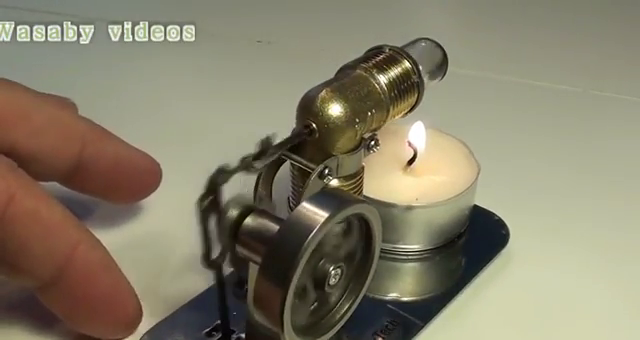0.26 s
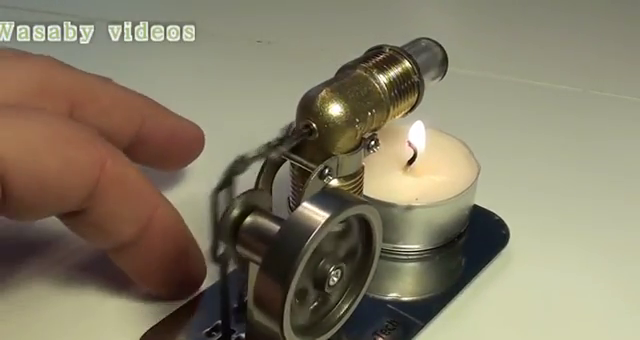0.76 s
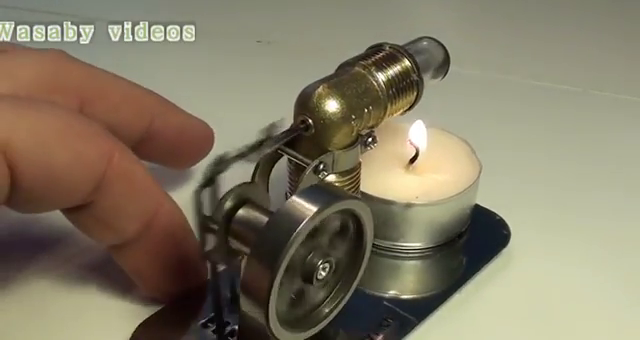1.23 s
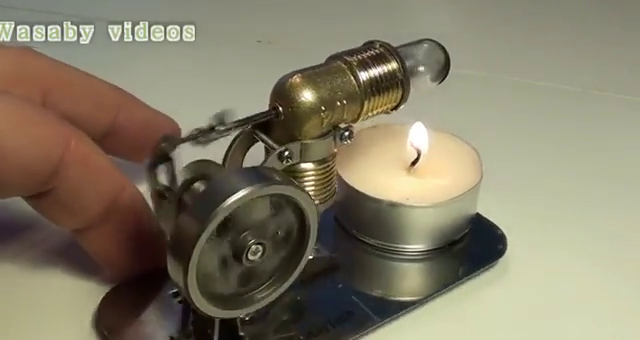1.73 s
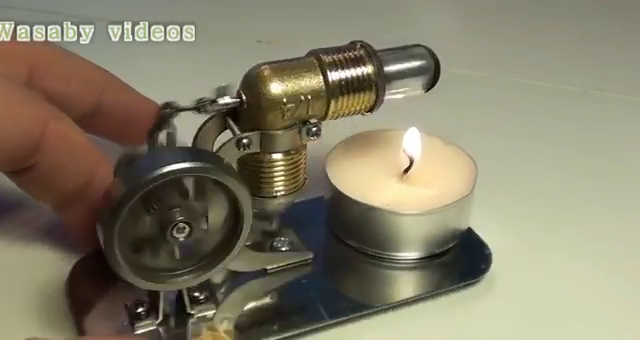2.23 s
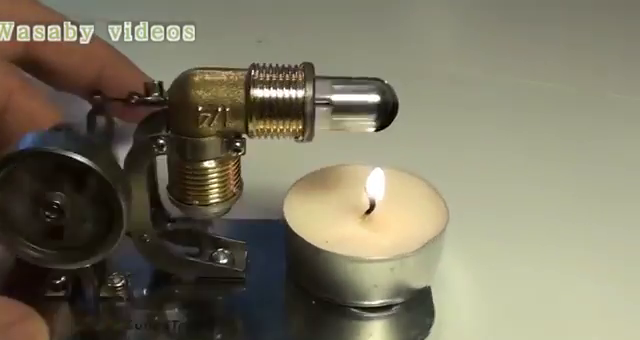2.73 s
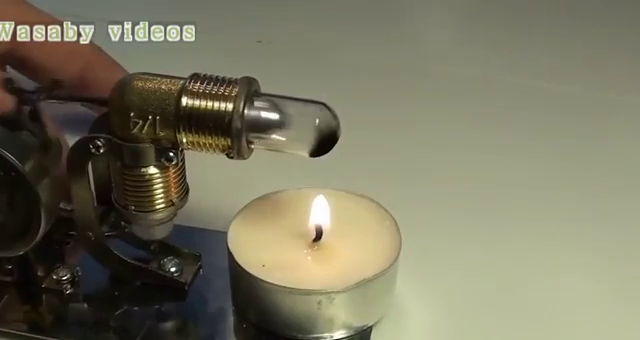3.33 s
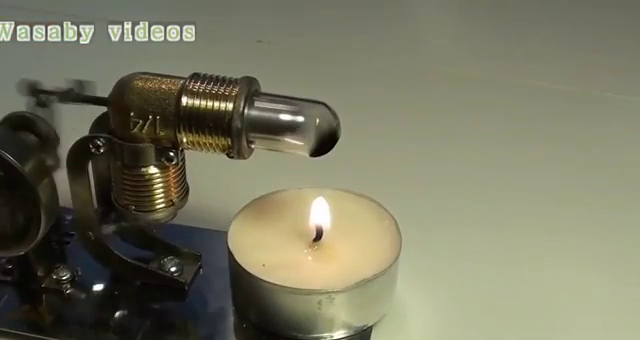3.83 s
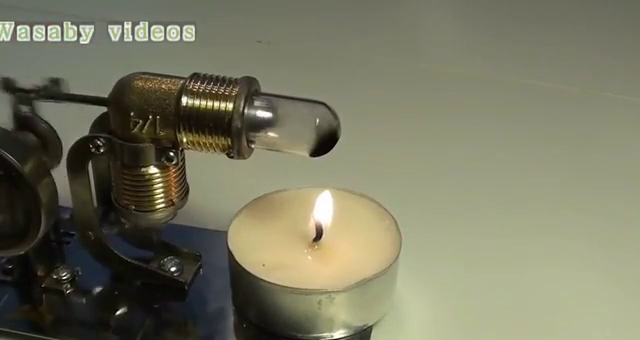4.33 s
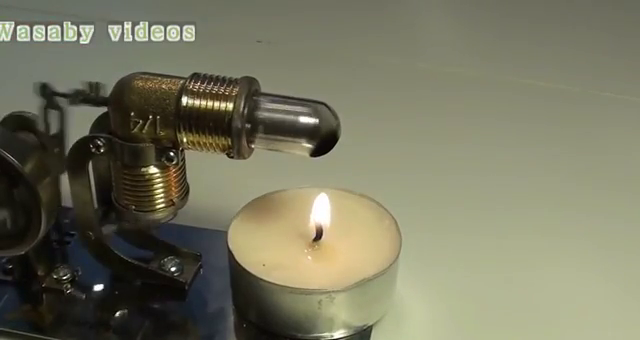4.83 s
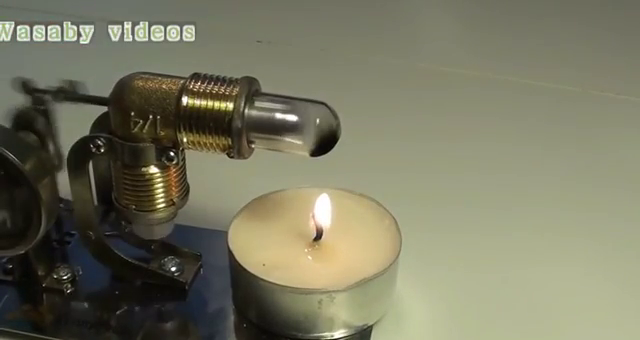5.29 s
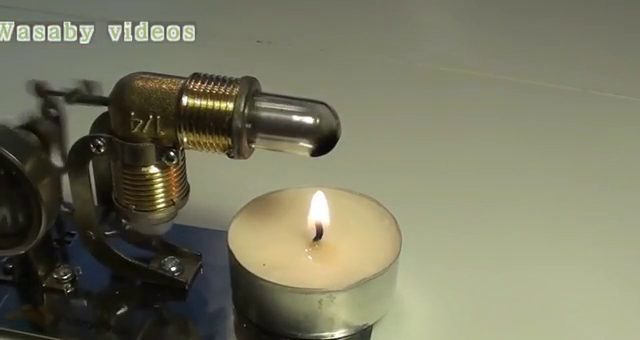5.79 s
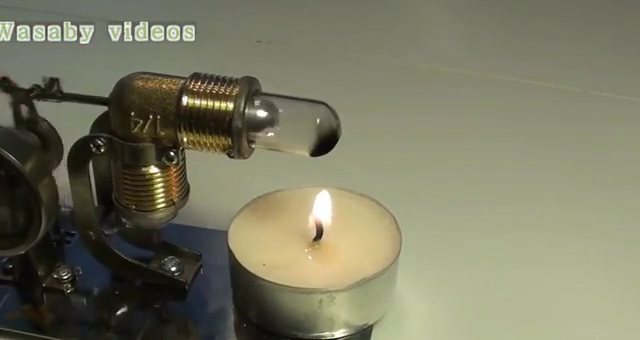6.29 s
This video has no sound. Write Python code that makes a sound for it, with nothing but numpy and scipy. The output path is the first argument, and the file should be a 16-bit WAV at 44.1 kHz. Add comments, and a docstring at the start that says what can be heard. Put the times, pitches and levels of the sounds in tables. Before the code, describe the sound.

Close up, a small metal engine is already running fast, about thirteen cycles per second. Each cycle scrapes out and back with a knock, a clack and fine ticks, giving a bright, hissy chatter with faint squeaky ringing. Sharp snaps punctuate the first second and a half; then it runs more smoothly. Two isolated snaps come late. Quiet small room, light stereo reflections, little bass.

```python
"""A small model hot-air engine runs at about 760 rpm on a table in a quiet room.
At first its piston runs dry and breaks loose with several sharp snaps. A hand soon closes on the base, the
piston frees itself, and the hand turns the engine from end-on to side-on and lets go. Two late snaps follow.
In every turn the piston scrapes out and back as noise made of tiny slips, which also sets the metal singing.
The loose linkage knocks in mid outward stroke and clacks late in the return; rough spots tick and shake the base."""
import sys
import numpy as np
from scipy import signal
from scipy.fft import rfft, irfft
from scipy.io import wavfile

SR = 44100
rng = np.random.default_rng(int(sys.argv[2]) if len(sys.argv) > 2 else 0)


def generate_wav(signal):
    """Clip the signal to [-1, 1] and save it as 16-bit WAV at the path in sys.argv[1]."""
    frames = np.transpose(np.atleast_2d(signal))
    scaled = np.clip(frames, -1, 1) * 32767
    pcm = np.round(scaled).astype(np.int16)
    wavfile.write(sys.argv[1], SR, pcm)


N = 288855
TIME = np.arange(N) / SR   # seconds

# Flywheel speed (turns per second) and where the crank stands at first (turns)
TURNS_PER_S, START_ANGLE = 12.6557, -.7746
# Short gains in flywheel speed [centre_s, spread_s, extra_turns_per_s]
SURGES = [(1.3604, .2293, .0882), (4.7557, .5476, .273)]
# The piston runs dry at first, then frees itself
FREES_AT_S, FREES_TAKES_S = 1.14, 0.59
# The hand closes on the base plate, holds it and lets go
GRIP_AT_S, GRIP_TAKES_S, LET_GO_AT_S, LET_GO_TAKES_S = 0.9, 1.0, 3.58, 0.13
# The hand swings the engine from end-on to side-on, which moves it a little to the left
SWING_AT_S, SWING_TAKES_S, SWING_PAN_DB = 1.14, 2.24, 0.4

# Rubbing force along each stroke of the piston [angle_turns, force_db]
OUTWARD = [(-.25, -12), (-.218, 1), (-.19, 0.5), (-.16, 1), (-.08, 6), (-.03, 5.5), (0.029, 4), (.1, -0.5),
           (.17, -14.5)]
RETURN = [(0.229, -18), (0.263, 0.5), (.29, 5), (.36, -3.5), (.46, 1), (.52, -1), (.57, -9), (0.621, -7.5)]
# Rough spots that catch in every turn [angle_turns, friction_db, tick_db, base_push_db]
CATCHES = [(-.216, 4.5, -44, -26), (-.163, -2.5, -21, 8.5), (-.1, 0, -44, 1.5), (-.015, 3.5, -17.5, 3.5),
           (.035, 0, -41, 13), (0.269, 2.5, -45, -18), (.288, -1, -17, 7), (0.393, 3, -44, -17),
           (.455, 1, -38, -35), (.546, -9, -18.5, 0.5)]
# Tone colour of the scrapes; the return one also colours the breakaway clicks [pitch_hz, level_db]
OUTWARD_COLOUR = [(300, -21), (2150, -21.5), (3000, -11.5), (3500, -21), (4850, -6.5), (5500, -1),
                  (6100, 0.5), (6600, 0.5), (7700, 2.9), (8900, -11), (9800, -1.5), (11200, -12),
                  (13400, -19.5), (15300, -22)]
RETURN_COLOUR = [(300, -21.5), (2150, -18.5), (3000, -8), (3500, -5), (4850, -4.5), (5500, 1), (6100, 1.5),
                 (6600, 0), (7700, 6), (8900, 0), (9800, -2.5), (11200, -8.5), (13400, -17.5), (15300, -14)]
# Resonances that the rubbing sets singing; side-on share is 0 end-on, 1 side-on
# [pitch_hz, width_hz, level_db, angle_turns, spread_turns, loudest_side_on_share, share_spread]
SINGING = [(7940, 820, -39.5, 0.024, 0.053, 0.02, .15), (8320, 470, -37.5, 0.0036, 0.22, 0.6, .28),
           (6480, 260, -40, 0.38, 0.047, 0, 0.24), (6364, 170, -46.5, 0.64, 0.2, .5, 3),
           (6940, 170, -48, 0.4, 0.12, .5, 3), (3797, 260, -48, 0.374, 0.073, 1, 0.41),
           (3404, 98, -52.5, -0.1, 0.13, 0.9, 0.92), (4040, 260, -53, -0.036, 0.1, 1, 1.5),
           (9840, 180, -44, 0.39, 0.071, 0.75, .2), (2517, 54, -59.5, 0.26, 0.27, 0, 1.5),
           (1400, 310, -59, 0.14, 0.38, 0.76, .2), (1680, 560, -62, 0.32, 0.15, 0.91, .1),
           (3560, 380, -55.5, -.155, 0.016, 0.91, .25)]
# The loudest snaps of the sticking piston [start_s, level_db]
SNAPS = [(0.2052, -9), (0.399, -16), (0.874, -14), (0.9545, -5), (0.994, -12), (1.3466, -11), (1.426, -14),
         (1.503, -10), (5.113, -14), (5.8186, -13)]
# Tone colour of the snaps [pitch_hz, level_db]
SNAP_COLOUR = [(300, -25), (2300, -33), (4000, -5.5), (6600, 7), (9700, -5), (13400, -18), (15300, -24)]
# Tone colour of the linkage knock [pitch_hz, level_db]
KNOCK_COLOUR = [(300, -31), (2150, -24), (3000, -18), (3500, -14.5), (4850, -9), (5500, -12.5),
                (6100, -8.5), (6600, 3), (7700, -1), (8900, -0.5), (9800, 0.5), (11200, -11), (13400, -16),
                (15300, -17)]
KNOCK_ANGLE, CLACK_ANGLE = -0.015, .544   # turns
# Ringing modes of the connecting rod [pitch_hz, width_hz, soft_level_db, added_when_hard_db]
ROD = [(3500, 620, -24.5, 0), (5420, 360, -14, 7), (6572, 790, 0, -2.5), (9710, 1320, -12.5, 9),
       (11800, 900, -26, 10)]
# Hardness of the rod's contact [resting_0_to_1, added_while_dry, added_under_hand]
CONTACT_HARDNESS = (0.54, 0.31, -0.38)
# Level of each part [resting_db, added_while_dry_db, added_under_hand_db]
OUTWARD_LEVEL = (-36.0, 1.6, -2)
RETURN_LEVEL = (-37.5, 1.9, -0.6)
KNOCK_LEVEL = (-38, -0.43, 0.39)
CLACK_LEVEL = (-35.5, 0.34, 0.8)
# Thud of the frame at the knock and the clack
# [angle_turns, spread_turns, resting_db, added_while_dry_db, added_under_hand_db]
THUDS = [(.0005, .013, -36.5, -.5, 0.8), (.56, 0.025, -48, -3, -5)]
THUD_HZ, THUD_RISE_HZ = 746, 145   # pitch of the thud, and its rise under the hand
# Tone colour of the ticks [pitch_hz, level_db]
TICK_COLOUR = [(300, -28), (1500, -6), (4000, -32), (9000, 4), (12000, 0.5), (13500, -7), (15300, -5.5)]
# Ringing modes of the base plate [pitch_hz, width_hz, level_db, added_under_hand_db]
BASE = [(162.5, 9.5, 0.5, -13), (221, 13.7, -5.5, 5), (244, 45, -14, 10.5), (351.5, 20, 4, 1),
        (425, 49, -2, 1.5), (483.5, 17.5, -3, 10), (614, 47, -7.5, 10), (671, 58, -10, 1),
        (815, 37, -7, -6), (880, 20, -10.5, 16.5), (1098, 79, -7, -4), (1488, 83, -10, 9.5),
        (1868, 57, -5, -2)]

# Pitches the metal frame lifts or swallows [pitch_hz, width_hz, level_db]
FRAME = [(2600, 310, -6), (4990, 570, -3.5), (5710, 310, 3), (5970, 270, -4), (6360, 380, 0),
         (6700, 160, -2.5), (7020, 350, 2), (7530, 450, -5), (8560, 410, -7.5), (10100, 460, 1),
         (10200, 200, -4.5), (12800, 390, 2.5), (12700, 1600, -4)]
# Bands whose level depends on which way the frame faces [pitch_hz, width_hz, end_on_db, side_on_db]
BEAMS = [(1560, 750, -3.5, 0), (3800, 630, -4.5, 0), (8170, 500, 4, -1)]
# A bright band that sweeps past the microphone in mid-swing, and the dip beside it
# [pitch_hz, width_hz, level_db]
SWEEP = [(8750, 500, 2), (5600, 1900, -2.5)]
SWEEP_SHARE, SWEEP_SPREAD = 0.73, 0.095   # side-on share at which it faces the microphone, and its spread
# Tone colour of the room's reflections [pitch_hz, level_db]
ROOM_COLOUR = [(200, -1), (1500, 5.5), (3500, 2.5), (6700, -0.5), (9000, -3.5), (15000, 7)]
# Tone colour of the difference between the two microphones [pitch_hz, level_db]
WIDTH = [(40, -7), (110, -13.5), (300, -14.5), (1200, -9), (2400, -32), (4400, -11.5), (8000, -16.5),
         (11000, -15.5), (15000, -7.5)]
# Tone colour of the quiet room [pitch_hz, level_db]
AIR = [(20, -32), (50, -17), (85, -13.5), (102, -0.5), (135, -11), (170, -0.5), (300, -2), (700, -0.5),
       (1500, -13), (4000, 2.5), (13000, -29.5)]
AIR_DB = -51
CUTOFF_HZ = 15900


def crank():
    """Crank position in turns: a steady speed with gentle surges, added up over time."""
    speed = np.full(N, TURNS_PER_S)
    for centre_s, spread_s, extra in SURGES:
        speed += extra * np.exp(-.5 * ((TIME - centre_s) / spread_s) ** 2)
    return START_ANGLE + np.cumsum(speed) / SR


def friction(turns, stroke):
    """Rubbing force along one stroke, altered at the rough spots and zero outside the stroke."""
    angles, friction_db = np.transpose(stroke)
    force_db = np.interp(turns, angles, friction_db, period=1)
    for angle, catch_db, _, _ in CATCHES:
        force_db = force_db + catch_db * near(turns, angle, spread=.008)
    sliding = (turns - angles[0]) % 1 < angles[-1] - angles[0]
    return sliding * from_db(force_db) * per_turn(turns, angles.mean(), spread_db=1.0)


def scrape(force, spectrum, grains_per_s, grain_db):
    """Dense tiny slips of uneven size, as strong as the rubbing force."""
    happens = rng.random(N) < grains_per_s / SR
    direction = rng.choice([-1, 1], N)
    size = from_db(grain_db * rng.standard_normal(N))
    return rms_one(colour(happens * direction * size * force, spectrum))


def breakaway(turns, angle, spread_db):
    """The piston sticks at its dead centre and lets go with a click, harder in some turns than in others."""
    return colour(contact(turns, angle, spread_db), RETURN_COLOUR)


def singing(turns, force, side_on):
    """Narrow resonances swell where the rubbing feeds them; each is loudest when it faces the microphone."""
    out = np.zeros(N)
    for hz, width_hz, db, angle, spread, facing, beam_width in SINGING:
        rub = rng.standard_normal(N) * force * near(turns, angle, spread)
        narrow = resonate(rub, hz, width_hz)
        tone = rms_one(resonate(narrow, hz, 3 * width_hz))
        out += from_db(db) * tone * faces(side_on, facing, beam_width)
    return out


def snaps(decay_s):
    """Now and then the piston sticks and breaks loose with a sharp crack and a short, fading crackle."""
    out, t = np.zeros(N), TIME[:SR // 100]
    for start_s, db in SNAPS:
        crackle = .5 * rng.choice([-1, 1], len(t)) * np.exp(-t / decay_s)
        crackle[0] = 2   # the crack itself
        out[round(start_s * SR):][:len(t)] += from_db(db) * crackle
    return colour(out, SNAP_COLOUR)


def knock(turns):
    """The crank pin chatters across its play for a few milliseconds, heard as a short burst of noise."""
    chatter = near(turns, KNOCK_ANGLE, spread=0.012)
    chatter += 0.32 * near(turns, KNOCK_ANGLE + 0.019, spread=0.022)   # weaker, later part
    strength = per_turn(turns, KNOCK_ANGLE, spread_db=1.0)
    return rms_one(colour(rng.standard_normal(N) * chatter * strength, KNOCK_COLOUR))


def clack(turns, hardness):
    """The rod hits the other end of its play and buzzes on the pin; hardness shifts the balance of its modes."""
    hit = contact(turns, CLACK_ANGLE, spread_db=1.15)
    buzz = 0.049 * rng.standard_normal(N) * near(turns, CLACK_ANGLE - .003, spread=0.016)
    out = np.zeros(N)
    for hz, width_hz, db, hard_db in ROD:
        ring = resonate(resonate(hit + buzz, hz, width_hz), hz, width_hz)
        out += from_db(db + hard_db * hardness) * ring
    return rms_one(out)


def thuds(turns, dryness, grip):
    """The frame swings briefly at the knock and the clack; the hand stiffens it, which raises the pitch."""
    out = np.zeros(N)
    pitch_hz = THUD_HZ + THUD_RISE_HZ * grip
    for angle, spread, *level in THUDS:
        since_s = past(turns, angle) / TURNS_PER_S
        swing = np.sin(2 * np.pi * pitch_hz * since_s) * near(turns, angle, spread)
        strength = per_turn(turns, angle, spread_db=1.5)
        out += from_db(loaded(level, dryness, grip)) * strength * swing
    return out


def ticks_and_base(turns, grip, base_db):
    """Each rough spot gives a bright tick and a push that rings the base plate, whose modes the hand alters."""
    ticks, pushes, plate = np.zeros(N), np.zeros(N), np.zeros(N)
    for angle, _, tick_db, push_db in CATCHES:
        ticks += from_db(tick_db) * contact(turns, angle, spread_db=7.5)
        pushes += from_db(push_db) * contact(turns, angle, spread_db=2.5)
    for k, (hz, width_hz, db, held_db) in enumerate(BASE):
        sign = (-1) ** k   # neighbouring modes move in opposite directions
        plate += sign * from_db(db + held_db * grip) * resonate(pushes, hz, width_hz)
    return colour(ticks, TICK_COLOUR) + from_db(base_db) * rms_one(plate)


def frame(x):
    """Vibration leaves through the metal frame, which lifts some pitches and swallows others."""
    for hz, width_hz, db in FRAME:
        x = x + (from_db(db) - 1) * resonate(x, hz, width_hz)
    return x


def beaming(x, side_on):
    """Turning the engine shifts the level of broad bands; a bright beam passes on the way."""
    for hz, width_hz, end_db, side_db in BEAMS:
        band_db = end_db + (side_db - end_db) * side_on
        x = x + (from_db(band_db) - 1) * resonate(x, hz, width_hz)
    for hz, width_hz, db in SWEEP:
        band_db = db * faces(side_on, SWEEP_SHARE, SWEEP_SPREAD)
        x = x + (from_db(band_db) - 1) * resonate(x, hz, width_hz)
    return x


def room(x, t60, delay_s):
    """Scattered reflections: fading noise that would fall 60 dB in t60 seconds, cut off after half a second."""
    t = TIME[:SR // 2]
    tail = rng.standard_normal(len(t)) * from_db(-60 * t / t60) * (t > delay_s)
    return signal.fftconvolve(x, rms_one(tail) / np.sqrt(len(t)))[:N]


def air():
    """The quiet background of the room: steady coloured noise."""
    return from_db(AIR_DB) * rms_one(colour(rng.standard_normal(N), AIR))


def ramp(start_s, length_s):
    """A steady move from 0 to 1."""
    return np.clip((TIME - start_s) / length_s, 0, 1)


def loaded(rule, dryness, grip):
    """A resting value, shifted by the dry piston and by the hand."""
    resting, when_dry, when_held = rule
    return resting + when_dry * dryness + when_held * grip


def faces(side_on, facing, beam_width):
    """How squarely a beam points at the microphone, 0-1."""
    return np.exp(-.5 * ((side_on - facing) / beam_width) ** 2)


def past(turns, angle):
    """Signed distance in turns from a crank angle."""
    return (turns - angle + .5) % 1 - .5


def near(turns, angle, spread):
    """A bell-shaped swell around a crank angle, once a turn."""
    return np.exp(-.5 * (past(turns, angle) / spread) ** 2)


def per_turn(turns, angle, spread_db):
    """A new random gain for each passage of a crank angle."""
    passage = np.floor(turns - angle + .5).astype(int)
    return from_db(spread_db * rng.standard_normal(size=128))[passage]


def contact(turns, angle, spread_db):
    """One click of uneven strength whenever the crank passes an angle."""
    count = np.floor(turns - angle)
    return np.diff(count, prepend=count[0]) * per_turn(turns, angle, spread_db)


def resonate(x, hz, width_hz):
    """One resonance, gain 1 on top; a narrower one rings longer."""
    r = np.exp(-np.pi * width_hz / SR)
    top = np.array([1, 0, -1]) * (1 - r * r) / 2
    bottom = [1, -2 * r * np.cos(2 * np.pi * hz / SR), r * r]
    return signal.lfilter(top, bottom, x + 1e-18)


def colour(x, points):
    """Filter with the given spectrum that reacts as early as possible (minimum phase)."""
    size = 4096
    hz, db = np.transpose(points)
    bin_hz = np.arange(size // 2 + 1) * SR / size
    shape_db = np.interp(np.log(bin_hz + 1), np.log(hz), db)
    # folding the cepstrum puts the response after each input sample, never before
    cepstrum = irfft(np.log(from_db(shape_db)))
    cepstrum[1:size // 2] *= 2
    cepstrum[size // 2 + 1:] = 0
    response = irfft(np.exp(rfft(cepstrum)))
    return signal.fftconvolve(x, response)[:N]


def from_db(db):
    """Decibels to gain."""
    return 10 ** (np.asarray(db) / 20)


def rms_one(x):
    """Scale to an average (rms) level of 1."""
    return x / np.sqrt(np.mean(x ** 2) + 1e-20)


def scene():
    """The crank drives the engine's regular parts; the engine stands close, almost in the middle."""
    turns = crank()
    grip = ramp(GRIP_AT_S, GRIP_TAKES_S) - ramp(LET_GO_AT_S, LET_GO_TAKES_S)
    side_on = ramp(SWING_AT_S, SWING_TAKES_S)
    dryness = 1 - ramp(FREES_AT_S, FREES_TAKES_S)
    outward_db = loaded(OUTWARD_LEVEL, dryness, grip)
    return_db = loaded(RETURN_LEVEL, dryness, grip)
    knock_db = loaded(KNOCK_LEVEL, dryness, grip)
    clack_db = loaded(CLACK_LEVEL, dryness, grip)
    hardness = loaded(CONTACT_HARDNESS, dryness, grip)

    outward, back = friction(turns, OUTWARD), friction(turns, RETURN)
    engine = from_db(outward_db) * scrape(outward, OUTWARD_COLOUR, grains_per_s=5000, grain_db=5.0)
    engine += from_db(return_db) * scrape(back, RETURN_COLOUR, grains_per_s=5000, grain_db=3.0)
    engine += from_db(outward_db + 15.5) * breakaway(turns, angle=-0.26, spread_db=6.5)
    engine += from_db(return_db + 23) * breakaway(turns, angle=.262, spread_db=5.5)
    engine += snaps(decay_s=0.00095)
    engine += from_db(knock_db) * knock(turns)
    engine += from_db(clack_db) * clack(turns, hardness)
    engine += thuds(turns, dryness, grip)
    engine += ticks_and_base(turns, grip, base_db=-56.5)
    engine = beaming(frame(engine), side_on) + singing(turns, outward + back, side_on)
    # so small a body radiates no deep bass
    bass_cut = signal.butter(3, 130, "high", fs=SR, output="sos")
    engine = signal.sosfilt(bass_cut, engine)

    reflections = colour(room(engine, t60=0.36, delay_s=0.0027), ROOM_COLOUR)
    mid = engine + from_db(-14) * reflections + air()
    # reflections off the table top and the walls reach the two microphones differently
    table_top = from_db(-3.5) * room(engine, t60=0.01, delay_s=0.0003)
    walls = from_db(-9.5) * room(engine, t60=0.58, delay_s=0.0023)
    side = colour(table_top + walls + air(), WIDTH)
    balance = from_db(SWING_PAN_DB * side_on / 2)
    return np.array([(mid + side) * balance, (mid - side) / balance])


def record(dry):
    """The highest peaks are rounded and the top of the treble is cut steeply."""
    top = .36   # level that the rounded peaks approach
    rounded = top * np.tanh(dry / top)
    treble_cut = signal.ellip(12, .1, 90, CUTOFF_HZ, fs=SR, output="sos")
    return signal.sosfilt(treble_cut, rounded)


dry = scene()
out = record(dry)
generate_wav(out)
```